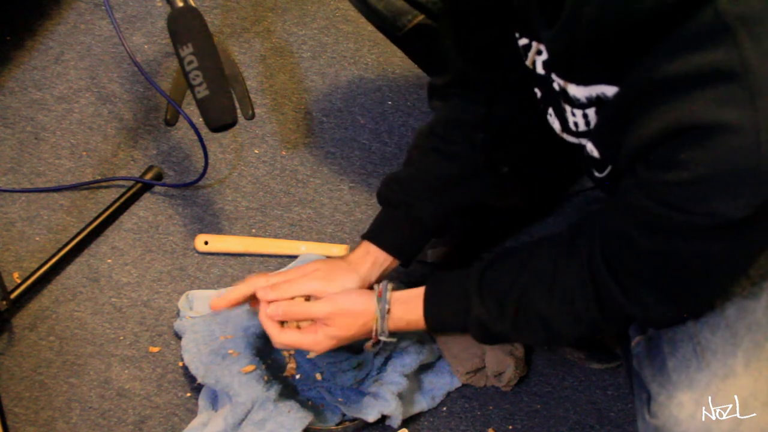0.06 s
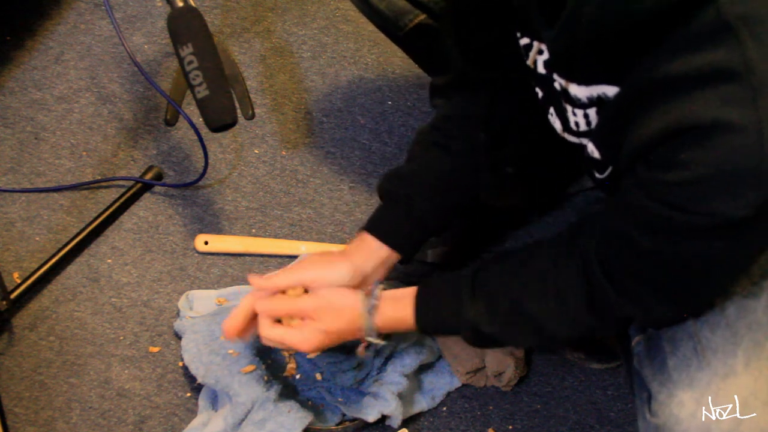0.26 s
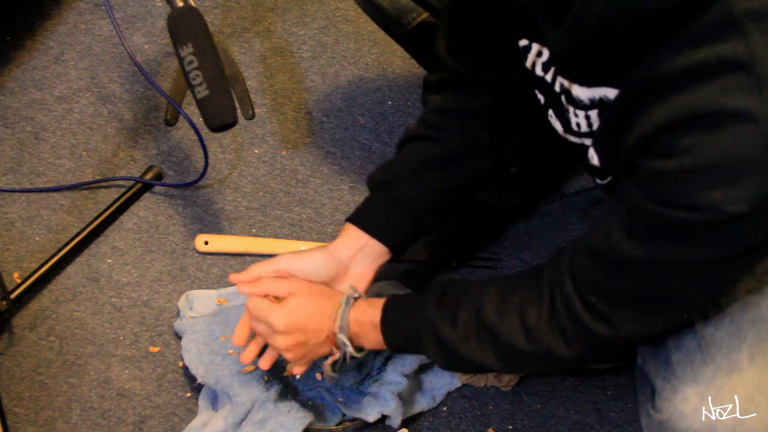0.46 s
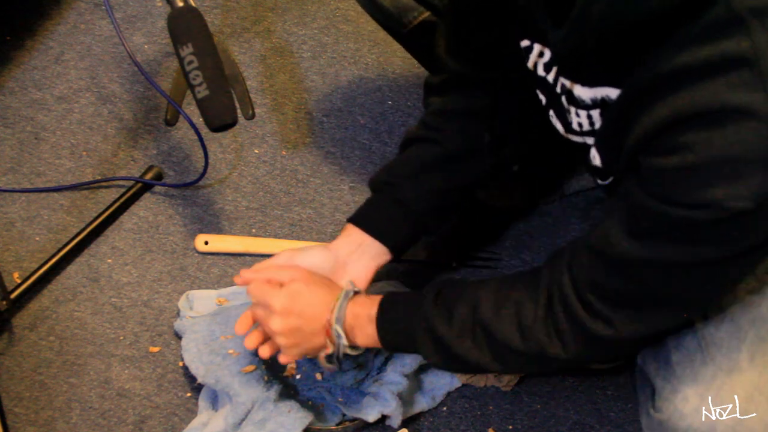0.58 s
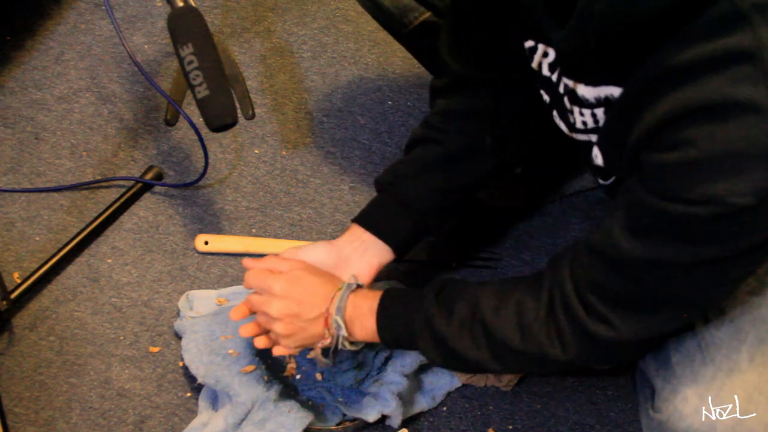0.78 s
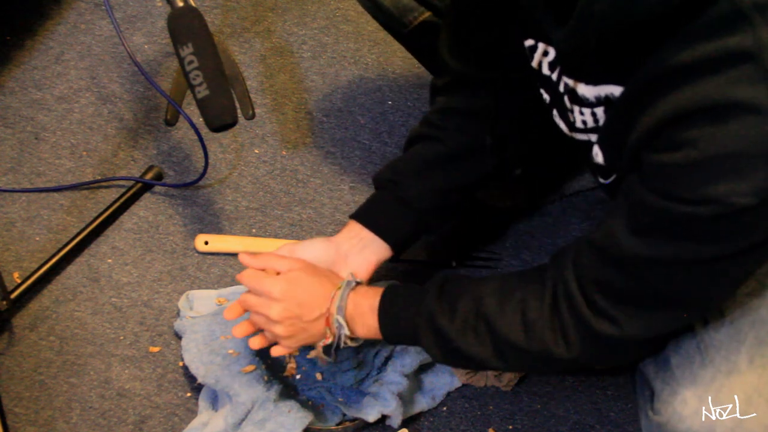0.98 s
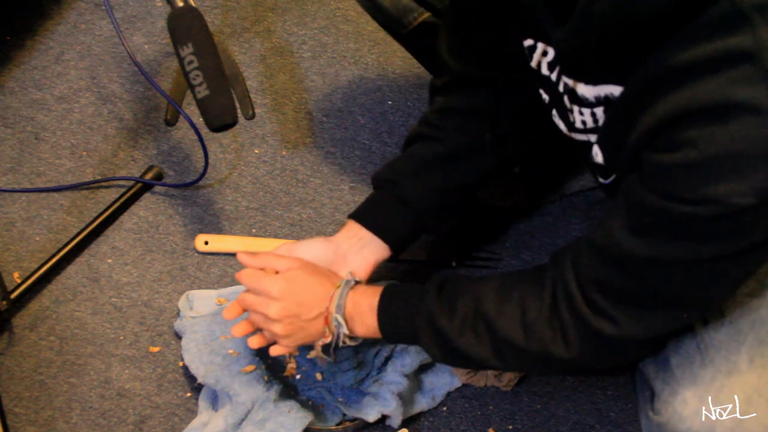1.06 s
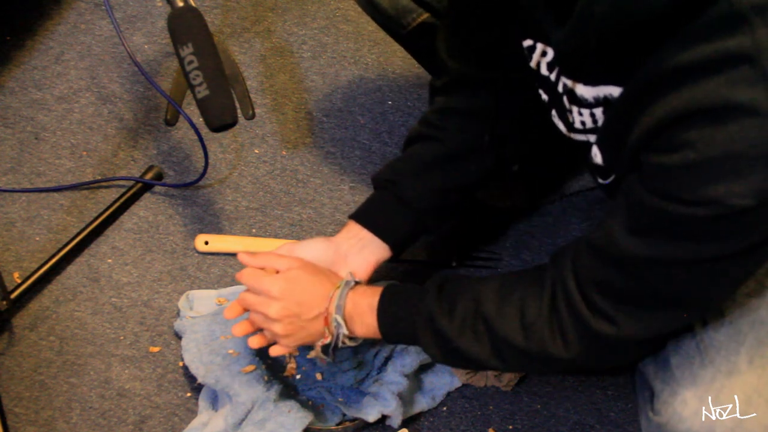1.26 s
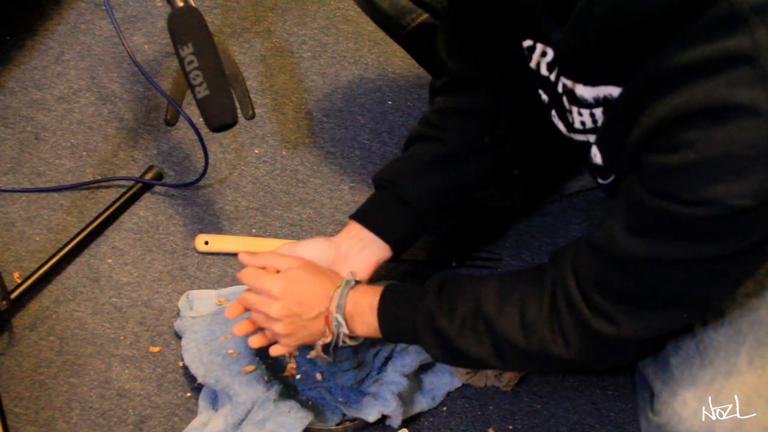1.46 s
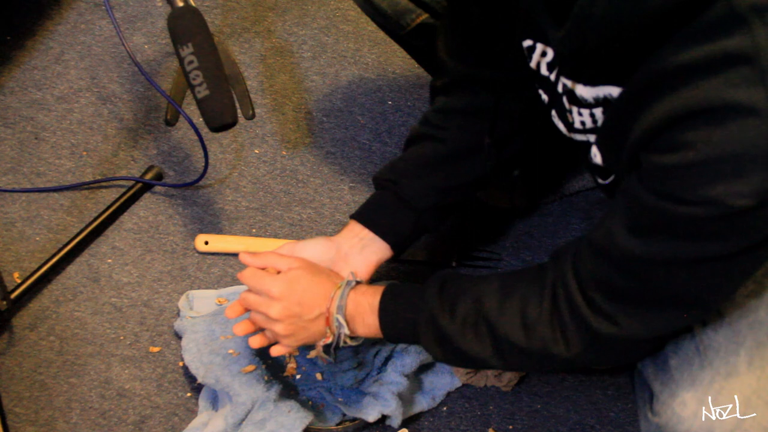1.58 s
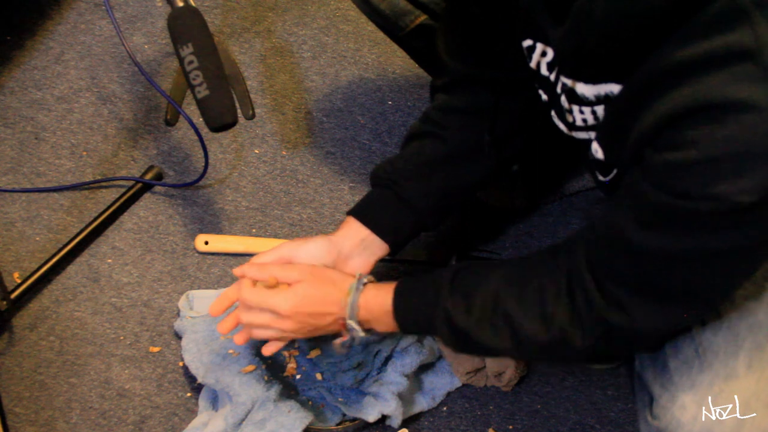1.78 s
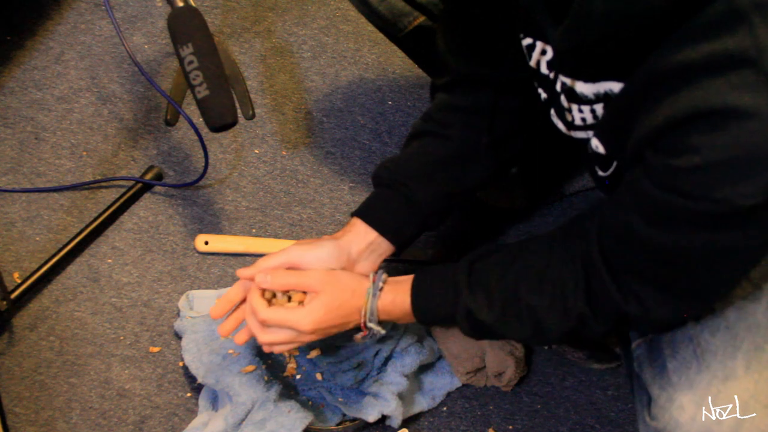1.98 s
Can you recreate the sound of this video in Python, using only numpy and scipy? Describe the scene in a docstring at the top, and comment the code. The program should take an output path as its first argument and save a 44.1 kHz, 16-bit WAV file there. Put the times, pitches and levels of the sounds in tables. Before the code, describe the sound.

Dry peanut shells crunch sharply in squeezing palms close up, thinning to a few light ticks

```python
"""Cupped hands close to a microphone in a quiet carpeted room squeeze and crack peanut shells for 2 s,
heard almost the same in both channels. Light cracks come at once, crowd together loudest from 0.24 to 0.65 s,
then thin out until about 1 s. After a near pause a few faint ones follow from 1.62 s.
Each is damped partials, a low snap and a bright tick, with a spray of noisy splinters, a knock in the hollow
of the hands and a thud in the palms. Shells grind as filtered grit and ring the hollow;
behind it all lie a weak room tail, hum and hiss."""
import sys
import numpy as np
from scipy import signal
from scipy.fft import rfft, irfft, next_fast_len
from scipy.io import wavfile
from scipy.ndimage import map_coordinates

SR = 44100
rng = np.random.default_rng(int(sys.argv[2]) if len(sys.argv) > 2 else 0)


def int16_out(signal):
    """Quantize to a 16-bit WAV file."""
    q = np.round(np.clip(np.atleast_2d(signal).T, -1, 1) * 32767)
    wavfile.write(sys.argv[1], SR, q.astype(np.int16))


N = 88200

# Fractures of the shells, close to the microphone: [t/s, snap peak level/dB, snap f/Hz,
# tick peak level/dB, tick f/Hz, splinter level/dB, hollow knock peak level/dB, thud level/dB]
SHELL_CRACKS = [(0.0066, -29, 3150, -36, 8800, -56, -50, -53),
                (0.0174, -32.5, 3900, -43, 7200, -64, -42, -54),
                (0.036, -38, 4150.0, -48, 7440.0, -52.5, -48.5, -65),
                (0.067, -38, 4900, -28.5, 6660, -49, -60, -55),
                (0.0886, -35, 5100, -33.5, 11620.0, -57.0, -44, -49),
                (0.1107, -43, 4900, -43, 6670.0, -58, -59, -57),
                (0.1224, -35, 3410.0, -41, 6940.0, -50, -63.5, -62),
                (0.1359, -30, 3660, -26, 11700, -31, -38, -44.5),
                (0.1399, -26, 3600, -26, 7240, -41, -40.5, -64),
                (0.1464, -20, 5170, -43, 9580.0, -50, -36.5, -43),
                (0.2025, -39.0, 5300, -29.5, 9480.0, -51, -54.5, -60),
                (0.2105, -43, 4810.0, -31.5, 8030.0, -47.0, -51, -59),
                (0.2214, -31, 3600, -37, 6750, -36, -46.5, -49),
                (0.2284, -30, 4770, -20, 6800, -43, -36.5, -54),
                (0.2403, -12.5, 3330, -19.5, 8560.0, -28.5, -27, -53),
                (0.264, -15.5, 3230, -14, 7650.0, -38, -33, -47),
                (0.27, -20, 4800, -9, 7400, -30, -22, -45),
                (0.2756, -11, 3330, -26, 7780.0, -21, -19.5, -49),
                (0.2795, -11.5, 3250, -19.5, 6550, -36, -30, -55),
                (0.2908, -22, 3500, -16, 7950, -47, -55, -44),
                (0.3088, -22, 3540, -15, 8980.0, -49, -49.5, -51),
                (0.3175, -12.0, 4390.0, -4.5, 12800, -27.0, -28.5, -39.5),
                (0.3223, -12, 3650, -13, 10250.0, -24.5, -37, -38.5),
                (0.332, -6, 5650, -5, 8400, -19, -24, -39), (0.3498, -19.5, 5000, -7, 8500, -37, -28, -36),
                (0.3687, -8.0, 3760, -3.5, 10800, -20.5, -21, -33.0),
                (0.3722, -16, 4240.0, -10, 8140, -45, -23, -62),
                (0.384, -36, 2820, -17.0, 12400, -44, -48.5, -54),
                (0.3868, -23, 4480.0, -21, 10700, -37, -41.0, -45),
                (0.3889, -18, 3680, -21, 10300, -30.5, -43, -43),
                (0.3919, -19, 4280, -7, 8850, -44, -49, -44.5),
                (0.4019, -18, 4340, -26, 8210.0, -44, -44, -52.0),
                (0.4064, -13.5, 3890, -16, 7940, -50, -37, -48.5),
                (0.4154, -34, 3760.0, -15, 8550.0, -29, -39, -35),
                (0.4171, -6, 5100, -5.5, 8360, -24, -40, -40.5),
                (0.42, -12, 5550, -6, 7500, -51, -51, -38.5),
                (0.4364, -11, 4200, -16, 8830.0, -36, -41.0, -47.5),
                (0.4447, -18, 4350, -3.5, 10750, -26, -42.5, -38.5),
                (0.4579, -10, 4870, -11, 7900, -30, -32, -35),
                (0.4658, -18, 4200, -28, 7970.0, -29, -31.5, -35),
                (0.4718, -11.5, 3570, -10.0, 8900, -25.5, -22, -25.5),
                (0.474, -23, 4020, -6, 10200, -23, -28.5, -30.5),
                (0.477, -18, 5000, -5, 9860, -27, -37, -35),
                (0.4818, -13.5, 4450, -17, 8280.0, -26.5, -23.5, -56),
                (0.496, -19.5, 4000, -12, 7700, -47, -32, -51),
                (0.51, -27, 4100, -31, 9030.0, -45, -60, -42),
                (0.5164, -21.0, 3340, -32, 6780.0, -39.0, -46, -44.5),
                (0.5232, -24, 3850, -12.5, 11800, -47.0, -55, -50.0),
                (0.5349, -22.5, 4050.0, -18, 8500, -27.5, -36, -46),
                (0.5465, -14, 3680, -18, 8100, -21, -44, -37),
                (0.5555, -12, 3290.0, -29, 8400, -28.5, -26, -34.5),
                (0.5581, -20, 3330.0, -11, 12300, -50, -30, -32.5),
                (0.5808, -26, 3320, -38, 8010.0, -58, -37.5, -43),
                (0.601, -24.5, 3500, -15, 9900, -27, -41, -38),
                (0.6041, -11, 3880, -9, 7600, -27, -54, -39.5),
                (0.6165, -25, 3400, -38, 13000, -33.5, -50, -40.5),
                (0.6353, -26, 4760, -37, 8070.0, -37, -45, -44),
                (0.647, -25, 3700.0, -29.5, 8900, -39, -62, -51),
                (0.6864, -43.0, 4240, -34, 7970.0, -56, -79, -56),
                (0.71, -53, 5800, -34, 8300.0, -53, -62, -60),
                (0.7476, -30, 3590.0, -43.0, 10380.0, -55, -71, -57),
                (0.7498, -34.5, 3000.0, -54, 8830.0, -60, -75, -52.5),
                (0.7668, -40, 3550.0, -30, 11300, -59.5, -69, -58),
                (0.773, -49, 3870.0, -37, 12130.0, -63.5, -67, -62),
                (0.7873, -33.5, 4200, -44, 8690.0, -48, -67.5, -55),
                (0.8063, -36, 5120.0, -35, 11550.0, -57.5, -67, -62),
                (0.8167, -42.5, 3350, -48, 7350.0, -58, -54.5, -54),
                (0.8377, -29.5, 5440.0, -35, 9600, -48, -70, -62.5),
                (0.862, -29, 3830, -36.5, 11770.0, -52, -46, -45),
                (0.8846, -39, 5330, -41, 10100.0, -51, -58.5, -63.5),
                (0.8976, -41, 3700, -47.5, 8040.0, -44, -61.5, -52),
                (0.948, -46, 3300, -49, 7800, -44.5, -57, -59),
                (0.952, -28, 5130, -16.5, 8140, -45, -58, -62),
                (0.9543, -29, 5950, -41, 6800.0, -44, -60, -65.0),
                (0.966, -44, 4000, -47, 7500, -48, -60, -55),
                (1.026, -46, 3180, -50, 7360.0, -60, -58.0, -59.5),
                (1.6206, -41, 3720, -39, 7950, -46.5, -63, -61),
                (1.6444, -45, 3480, -31.5, 7980.0, -58, -43, -61),
                (1.6572, -36.5, 4930, -34.5, 8810.0, -59, -44, -58),
                (1.7124, -70, 5940, -20, 9000, -39, -61, -62),
                (1.761, -60, 5900, -39, 7000.0, -63, -64, -58),
                (1.832, -49, 3920, -50, 8600, -61, -46, -59),
                (1.9205, -40, 4700.0, -51.5, 10250.0, -53, -58, -63.5),
                (1.9378, -42, 3670, -52, 6960.0, -60.5, -69.0, -69),
                (1.9669, -45, 3630, -44.0, 8000, -66.0, -66, -69.5),
                (1.99, -39, 5000, -47, 8710.0, -64, -74, -60)]
# Cycles until a partial has decayed to 1/e
SNAP_CYCLES, TICK_CYCLES, KNOCK_CYCLES = 4.5, 3.5, 8
# Scatter of the partials in log pitch
SNAP_SPREAD, TICK_SPREAD, KNOCK_SPREAD = .08, .16, .03
BRIGHT_BIAS_DB = -17  # shifts the tick-to-snap balance that colours the splinters


def cracks(ring_hz):
    """Snap, tick and splinters for every fracture; the blow knocks the hollow and thuds in the palms."""
    (times, snap_db, snap_hz, tick_db, tick_hz,
     spray_db, knock_db, thud_db) = np.transpose(SHELL_CRACKS)
    bright = 1 / (1 + amp(snap_db - tick_db - BRIGHT_BIAS_DB))
    snap = bursts(times, snap_db, snap_hz, SNAP_CYCLES, SNAP_SPREAD, count=3)
    tick = bursts(times, tick_db, tick_hz, TICK_CYCLES, TICK_SPREAD, count=6)
    spray = splinters(times, spray_db, snap_hz, tick_hz, bright)
    hollow_hz = ring_hz[np.round(times * SR).astype(int)]
    knock = bursts(times, knock_db, hollow_hz, KNOCK_CYCLES, KNOCK_SPREAD, count=2)
    return snap + tick + spray + knock + thuds(times, thud_db)


ATTACK_CYCLES = 0.78


def bursts(times, db, hz, cycles, spread, count):
    """Short damped clusters of partials, one for each crack, with the given peak level."""
    t = np.arange(SR // 25) / SR
    draw = rng.standard_normal((len(times), count, 1))
    scatter = np.exp(spread * (draw - draw.mean(axis=1, keepdims=True)))
    turns = np.minimum(hz[:, None, None] * scatter, SR / 2.8) * t
    attack = 1 - np.exp(-(turns / ATTACK_CYCLES) ** 2)
    wave = (np.sin(2 * np.pi * turns) * np.exp(-turns / cycles) * attack).sum(axis=1)
    gain = amp(db) / np.abs(wave).max(axis=1)
    return place(times, wave * gain[:, None])


# Colour of the flying splinters: [f/Hz, relative level per Hz/dB]
SPLINTER_COLOUR = [(700, -58), (1400, 1), (2500, 1), (4000, -4), (8000, -4.5), (13000, -5.5),
                   (16000, -10.5)]
SPLINTER_T60_S, SPLINTER_RISE_S = 0.051, 0.00031
SPLINTER_WIDTH = .22  # log width around the crack's own pitches
SPLINTER_SKIRT_DB = -19  # floor of the colour far from those pitches


def splinters(times, db, snap_hz, tick_hz, bright):
    """Grit that flies after each crack and dies away, coloured like the crack."""
    size = 4096
    at = np.round(times * SR).astype(int)[:, None] + np.arange(size)
    f = np.fft.rfftfreq(size, 1 / SR) + 1

    def bump(centre_hz):
        return np.exp(-.5 * (np.log(f / centre_hz[:, None]) / SPLINTER_WIDTH) ** 2)

    share = bright[:, None]
    power = (1 - share) * bump(snap_hz) + share * bump(tick_hz) + amp(2 * SPLINTER_SKIRT_DB)
    hz, colour_db = np.transpose(SPLINTER_COLOUR)
    gain = np.sqrt(power) * amp(np.interp(np.log(f), np.log(hz), colour_db))
    gain = gain / np.sqrt(np.mean(gain ** 2, axis=1, keepdims=True))
    rows = irfft(rfft(grit()[at % N]) * gain, size)
    t = np.arange(size) / SR
    decay = amp(db[:, None] - 60 * t / SPLINTER_T60_S)
    rise = 1 - np.exp(-(t / SPLINTER_RISE_S) ** 2)
    return place(times, rows * decay * rise)


# Resonances of palms and nuts: [f/Hz, relative level/dB, decay/cycles]
PALM_THUD = [(592, -8.5, 4.75), (845, -1, 3.64), (1760, 1, 13)]


def thuds(times, thud_db):
    """Each blow excites the damped resonances of palms and nuts."""
    return sum(bursts(times, thud_db + db, np.full(len(times), hz), cycles, KNOCK_SPREAD, count=2)
               for hz, db, cycles in PALM_THUD)


# Shells rubbing in the cupped hands:
# [t/s, grinding level/dB, level of the hollow's ring/dB, hollow f/Hz]
RUBBING = [(0, -45, -53.5, 1236), (.1, -47, -55.5, 1204), (.15, -39.5, -47.5, 1160),
           (.19, -49.5, -52.5, 1180), (.24, -31.5, -51.5, 1181), (.3, -32, -36.5, 1162),
           (.38, -25, -38.5, 1105), (.44, -33, -46.5, 1130), (.49, -31, -42, 1059), (.56, -38, -50, 932),
           (.61, -41.5, -52.5, 880), (.655, -59.5, -66, 986), (.8, -55, -63.5, 1100),
           (.9, -54.5, -62.5, 1028), (1.0, -58.5, -68.5, 1095), (1.07, -64.5, -71, 1081),
           (1.59, -85, -88, 1150), (1.625, -50.5, -56.5, 1153), (1.68, -52.5, -55.5, 1106),
           (1.72, -47.5, -53, 1130), (1.78, -57.5, -59.5, 1123), (1.85, -52, -58, 1116),
           (1.9, -58.5, -61.5, 1110), (1.93, -58, -59.5, 1130), (2.0, -63.5, -67, 1080)]


def hands():
    """Everything between the palms: cracks, grinding, and the hollow rung in the same jerks."""
    grind_db, ring_db, ring_hz = curves(RUBBING)
    slip = jerks()
    return cracks(ring_hz) + grinding(grind_db, slip) + slip * hollow(ring_db, ring_hz)


# Colour of shell grinding on shell: [f/Hz, relative level per Hz/dB]
GRIND_COLOUR = [(1200, -56.5), (1600, -15.5), (2000, -17.5), (2350, -4), (2750, -10.5), (3450, 1),
                (4100, -7.5), (5200, -3.5), (7500, -11.5), (12700, -19), (16000, -21.5)]


def grinding(grind_db, slip):
    """Shells grind on each other: grit swelling in jerks, filtered to the colour of the shell."""
    return coloured(amp(grind_db) * slip * grit(), GRIND_COLOUR)


GRIT_PER_S, GRIT_LOW_HZ, GRIT_HIGH_HZ = 2500, 700, 17000
GRIT_SPREAD_DB, GRIT_TOP_DB = 4.5, 11  # scale of the exponential draw of sizes; largest size
GRIT_SHARE, GRIT_CYCLES = 0.31, 2.1  # power share of the fractures; cycles to 1/e


def grit():
    """Tiny fractures, each with its own pitch and size, over friction noise; rms about 1."""
    draw = rng.random((int(GRIT_PER_S * N / SR), 3))
    hz = GRIT_LOW_HZ * (GRIT_HIGH_HZ / GRIT_LOW_HZ) ** draw[:, 1:2]
    size_db = np.minimum(-GRIT_SPREAD_DB * np.log(1 - draw[:, 2:]), GRIT_TOP_DB)
    turns = hz * np.arange(SR // 200) / SR
    envelope = np.exp(-turns / GRIT_CYCLES) * (1 - np.exp(-turns ** 2))
    grains = amp(size_db) * hz * np.sin(2 * np.pi * turns) * envelope
    fractures = unit(place(draw[:, 0] * N / SR, grains))
    friction = rng.standard_normal(N)
    return np.sqrt(GRIT_SHARE) * fractures + np.sqrt(1 - GRIT_SHARE) * friction


FLARE_DB, FLARE_PER_S = 2, 170  # scatter of the jerks; random levels per second


def jerks():
    """Gain of rms 1 that jumps about as the shells catch and slip."""
    knots = rng.standard_normal(int(N * FLARE_PER_S / SR) + 4)
    return unit(amp(FLARE_DB * map_coordinates(knots, [np.arange(N) * FLARE_PER_S / SR])))


RING_STEPS_HZ = np.arange(850, 1400, 50)  # fixed resonators between which the ring glides
RING_WIDTH_HZ = 200  # of one of the two cascaded filter stages
OVERTONE, OVERTONE_DB = 2.02, -6  # second resonance: pitch ratio, relative level
RUB_THUD_DB = -6.5  # deep part of the rubbing, relative to the ring


def hollow(ring_db, ring_hz):
    """The air between the palms, rung by the rubbing; its pitch moves as the hands close."""
    push = grit()

    def air(hz, width):
        def resonance(f):
            return (1j * f * width / (hz * hz - f * f + 1j * f * width)) ** 2
        return unit(filtered(push, resonance))

    step = RING_STEPS_HZ[1] - RING_STEPS_HZ[0]
    ring = 0
    for hz in RING_STEPS_HZ:
        both = air(hz, RING_WIDTH_HZ) + amp(OVERTONE_DB) * air(OVERTONE * hz, RING_WIDTH_HZ)
        ring = ring + np.clip(1 - np.abs(ring_hz - hz) / step, 0, 1) * both
    deep = sum(amp(db) * air(hz, 2 * hz / cycles) for hz, db, cycles in PALM_THUD[:2])
    return amp(ring_db) * (ring + amp(RUB_THUD_DB) * deep)


ROOM_DB, ROOM_T60_S = -17.5, .3


def room(x):
    """A short, weak answer of the room: a decaying noise tail starting after 4 ms."""
    t = np.arange(SR // 2) / SR
    tail = rng.standard_normal(len(t)) * amp(-60 * t / ROOM_T60_S) * (t > .004)
    return amp(ROOM_DB) * signal.fftconvolve(x, tail / np.linalg.norm(tail))[:N]


# Colour of the quiet room's background: [f/Hz, relative level per Hz/dB]
HUM_COLOUR = [(12, -8.5), (20, -13.5), (37, -4.5), (101, 1), (142, -7), (234, -7), (262, -14.5), (357, -12),
              (499, -23.5), (558, -21.5), (1290, -28.5), (1910, -28.5), (6720, -32.5), (13900, -36),
              (16000, -44.5)]
HUM_DB = -54.5
HUM_SIDE_DB, HUM_SIDE_HZ = -23.5, 60  # channel difference: level relative to the hum, low-pass corner
MAINS_HZ, MAINS_DB = 49.2, -65  # the level is the tone's peak


def hum():
    """Coloured room noise and a faint mains tone; mainly the deepest bass differs between channels."""
    mid = amp(HUM_DB) * unit(coloured(rng.standard_normal(N), HUM_COLOUR))
    mid = mid + amp(MAINS_DB) * np.sin(2 * np.pi * (MAINS_HZ * np.arange(N) / SR + rng.random()))
    side = coloured(rng.standard_normal(N), HUM_COLOUR)
    side = filtered(side, lambda f: 1 / (1 + 1j * f / HUM_SIDE_HZ))
    side = amp(HUM_DB + HUM_SIDE_DB) * unit(side)
    return np.array([mid + side, mid - side])


def amp(db):
    """Amplitude ratio of a level in dB."""
    return 10 ** (np.asarray(db) / 20)


def unit(x):
    """x scaled to rms 1."""
    return x / np.sqrt(np.mean(x ** 2) + 1e-20)


def filtered(x, response):
    """x times a complex response of frequency."""
    m = next_fast_len(N + 8192)
    return irfft(rfft(x, m) * response(np.fft.rfftfreq(m, 1 / SR)), m)[..., :N]


def coloured(x, points):
    """x through a causal minimum-phase filter with the (Hz, dB) shape and unit power gain."""
    f, level_db = np.transpose(points)
    size = 2 ** 14
    log_f = np.log(np.fft.rfftfreq(size, 1 / SR) + 1)
    shape_db = np.interp(log_f, np.log(f + 1), np.maximum(level_db, -100))
    # Folding the cepstrum onto positive time makes the filter causal
    cepstrum = irfft(shape_db * np.log(10) / 20)
    cepstrum[1:size // 2] *= 2
    cepstrum[size // 2 + 1:] = 0
    h = irfft(np.exp(rfft(cepstrum)))
    return signal.fftconvolve(x, h / np.linalg.norm(h))[:N]


def curves(rows):
    """One value per sample for each column after the time."""
    times, *columns = np.transpose(rows)
    return [np.interp(np.arange(N) / SR, times, column) for column in columns]


def place(times, rows):
    """Sum of one short sound a row, each from its time."""
    at = np.round(times * SR).astype(int)[:, None] + np.arange(rows.shape[1])
    return np.bincount(at.ravel(), rows.ravel(), N + SR)[:N]


def scene():
    """The hands up close, the room's answer to them, and the room's own hum."""
    close = hands()
    return close + room(close) + hum()


HISS_DB = -73.5  # before the band limit
TOP_HZ = 16000


def record(dry):
    """The microphone adds its own hiss, equal in both channels; a steep band limit follows."""
    hiss = amp(HISS_DB) * rng.standard_normal(N)
    return filtered(dry + hiss, lambda hz: 1 / (1 + (hz / TOP_HZ) ** 200))


dry = scene()
out = record(dry)
int16_out(out)
```